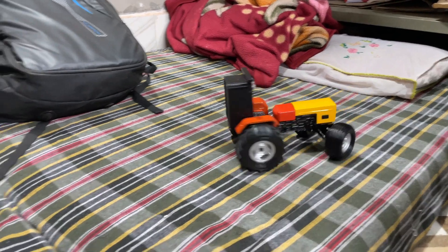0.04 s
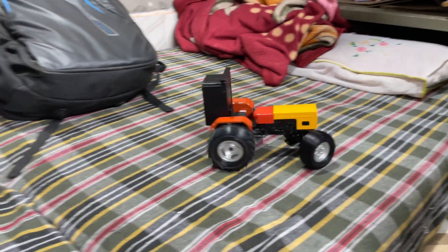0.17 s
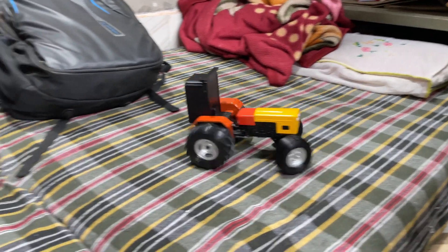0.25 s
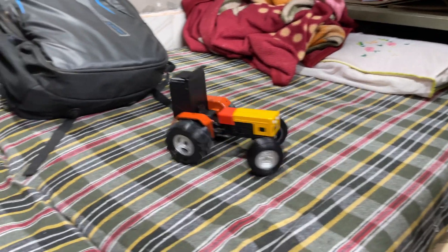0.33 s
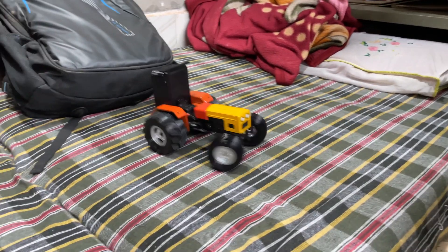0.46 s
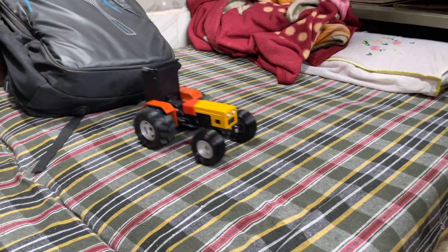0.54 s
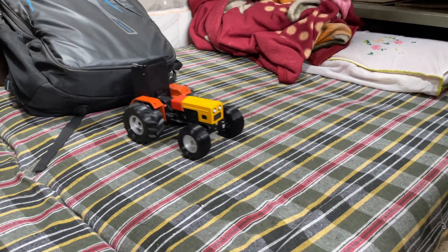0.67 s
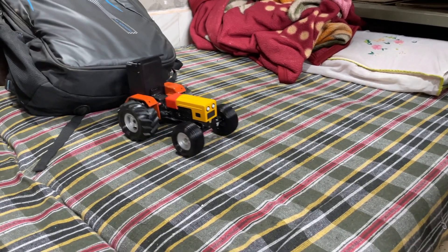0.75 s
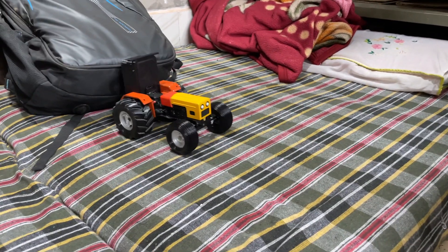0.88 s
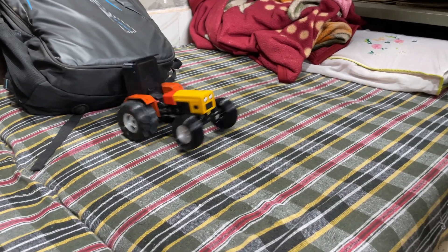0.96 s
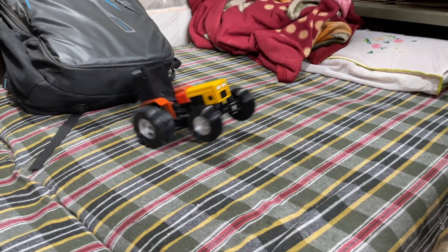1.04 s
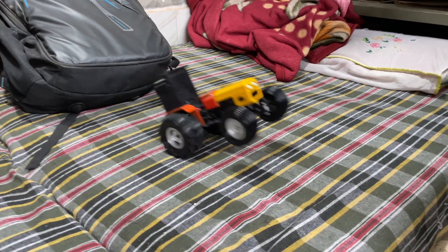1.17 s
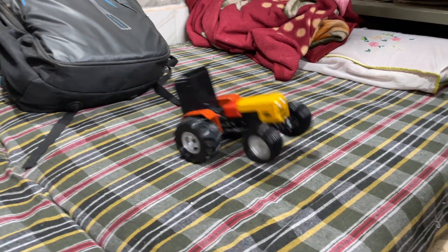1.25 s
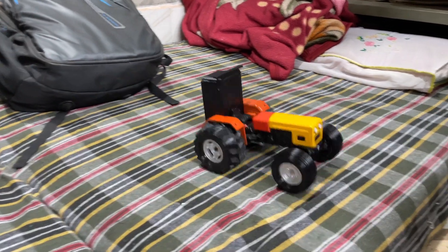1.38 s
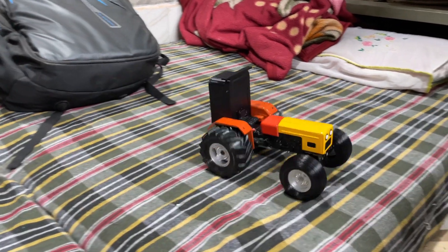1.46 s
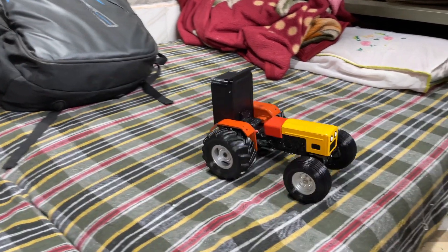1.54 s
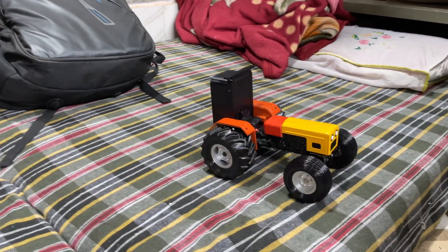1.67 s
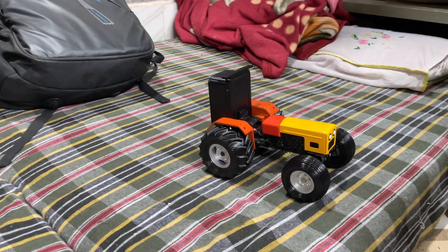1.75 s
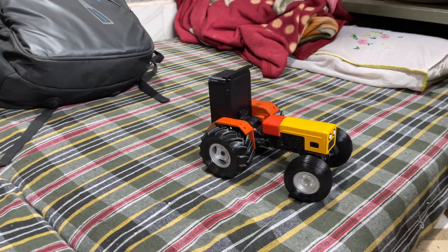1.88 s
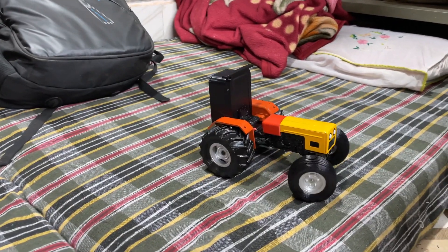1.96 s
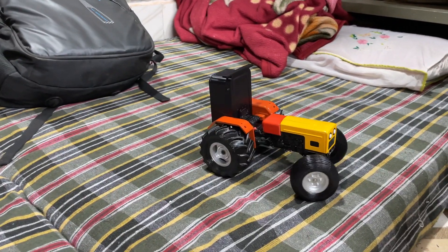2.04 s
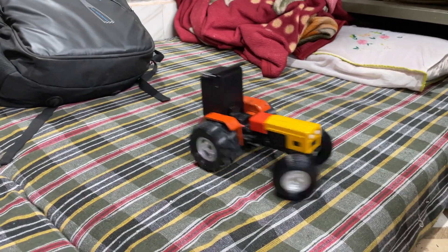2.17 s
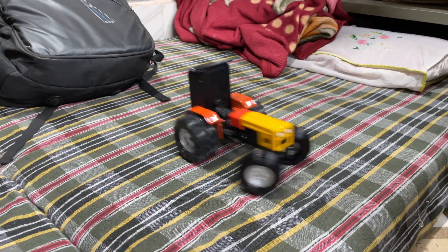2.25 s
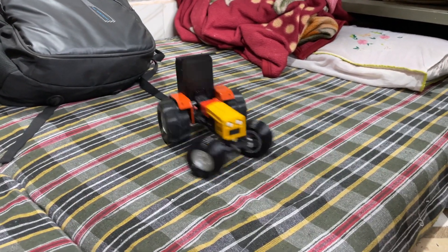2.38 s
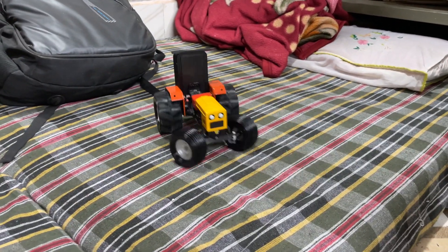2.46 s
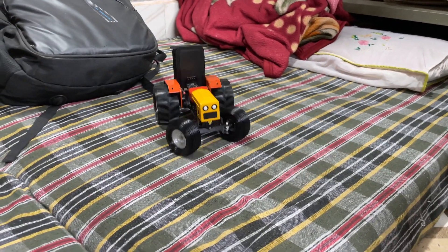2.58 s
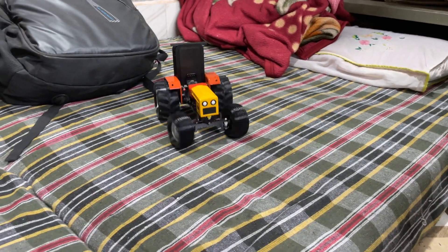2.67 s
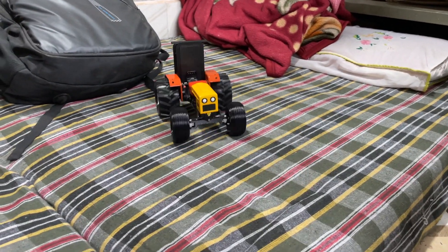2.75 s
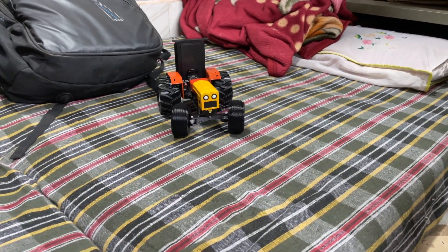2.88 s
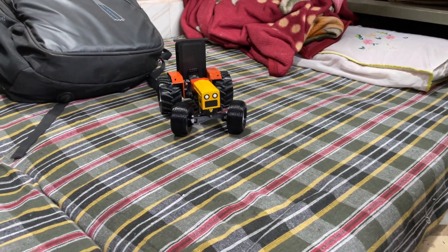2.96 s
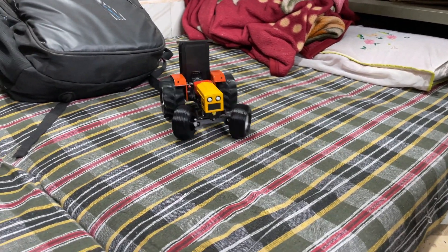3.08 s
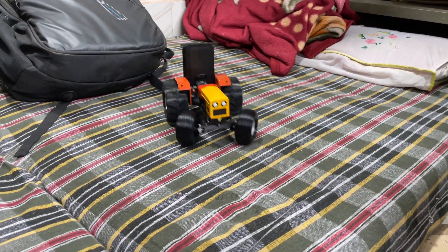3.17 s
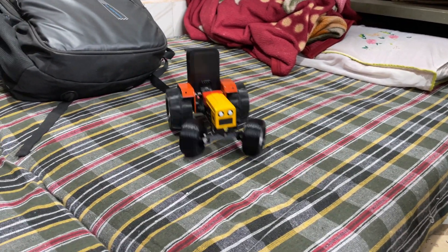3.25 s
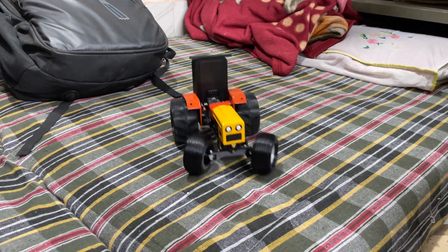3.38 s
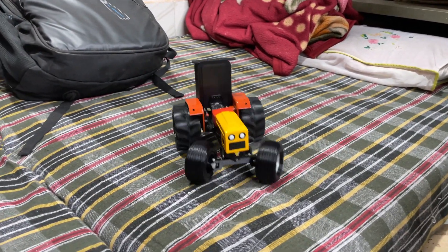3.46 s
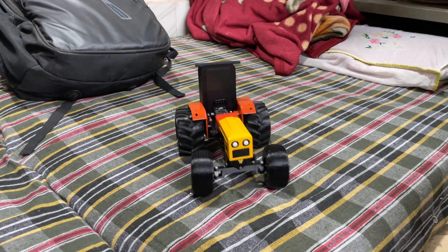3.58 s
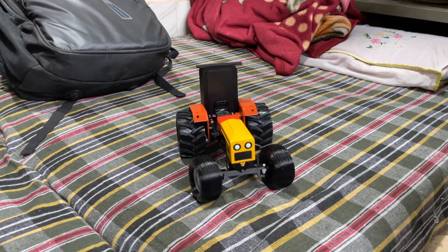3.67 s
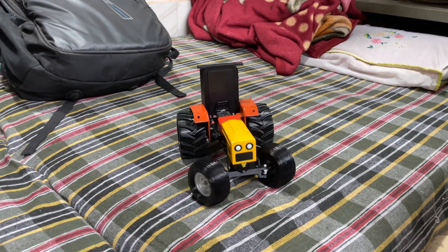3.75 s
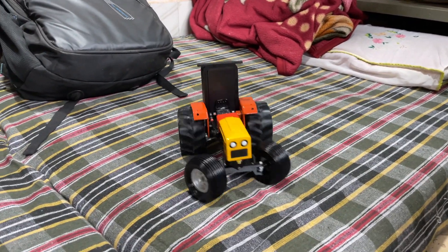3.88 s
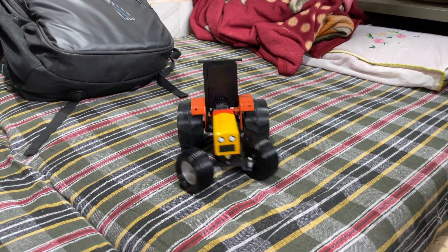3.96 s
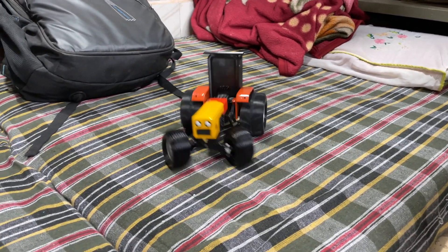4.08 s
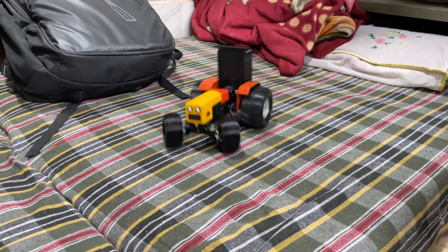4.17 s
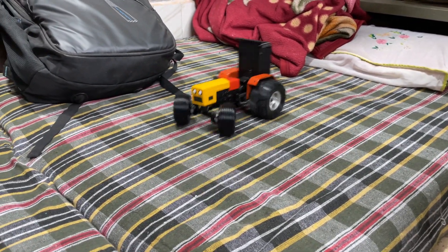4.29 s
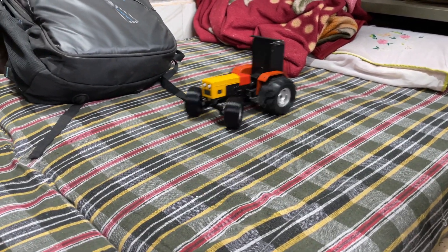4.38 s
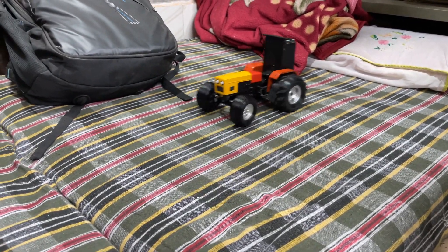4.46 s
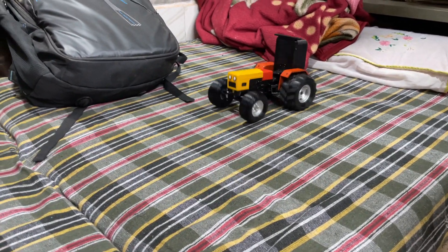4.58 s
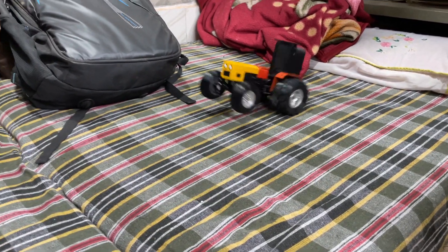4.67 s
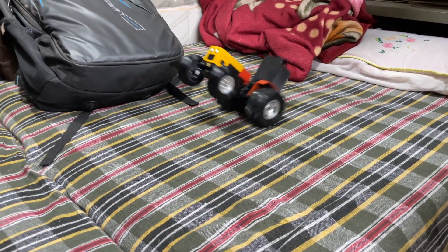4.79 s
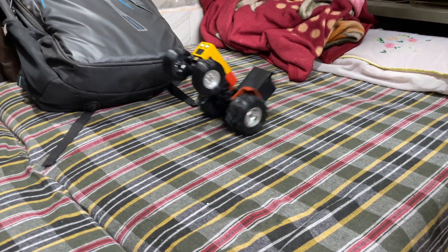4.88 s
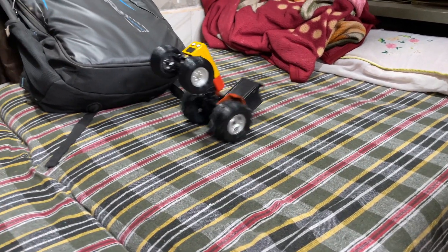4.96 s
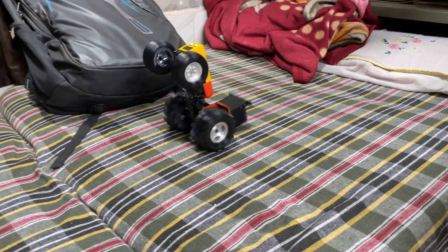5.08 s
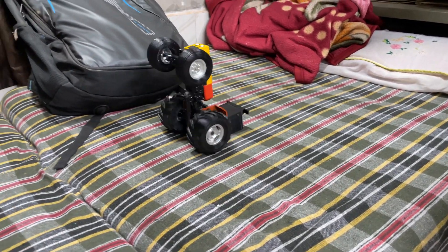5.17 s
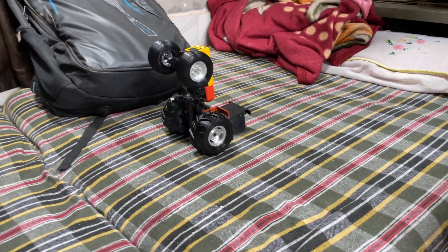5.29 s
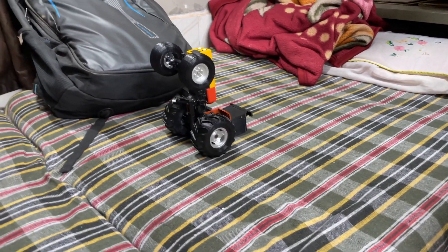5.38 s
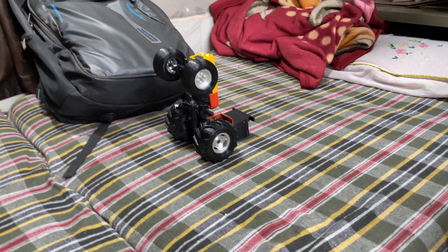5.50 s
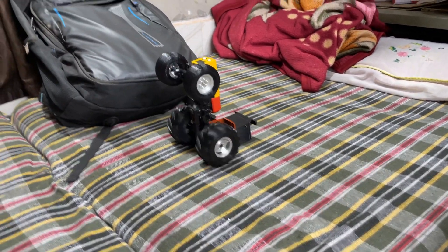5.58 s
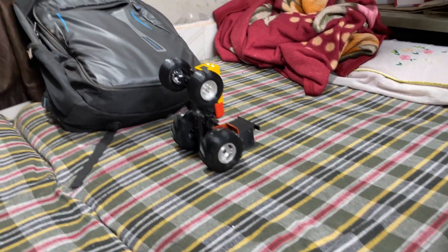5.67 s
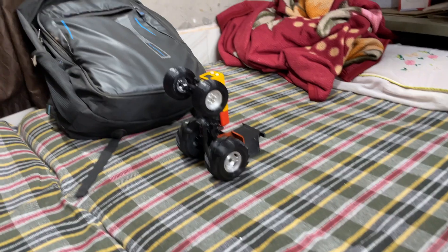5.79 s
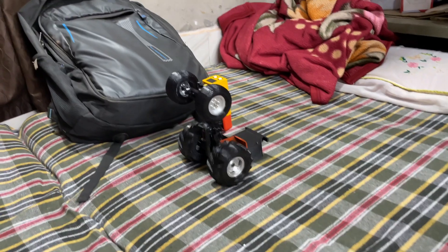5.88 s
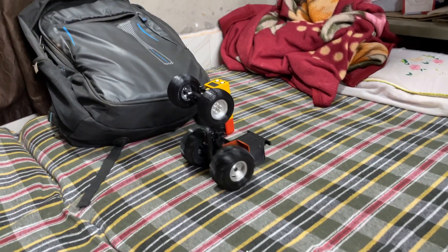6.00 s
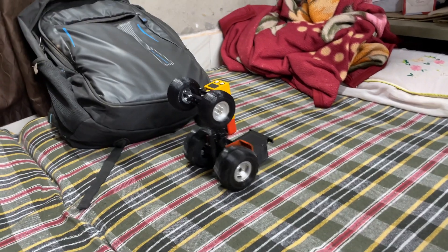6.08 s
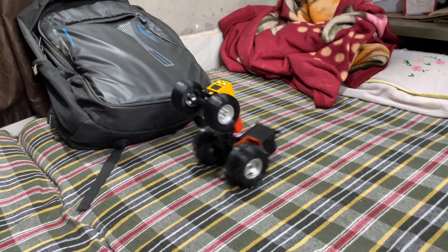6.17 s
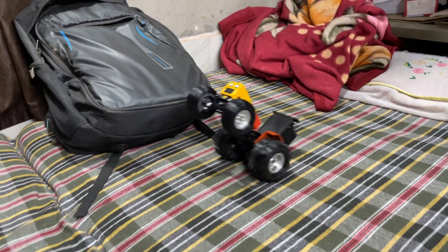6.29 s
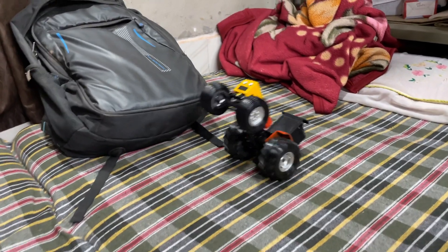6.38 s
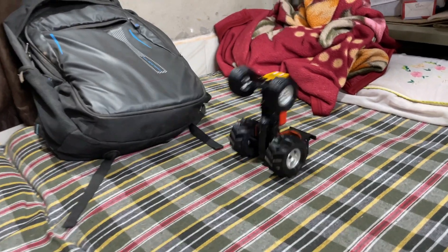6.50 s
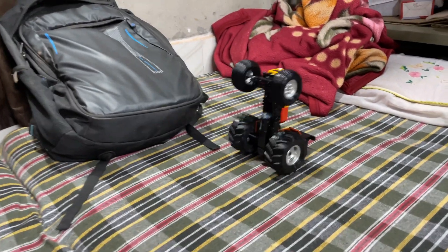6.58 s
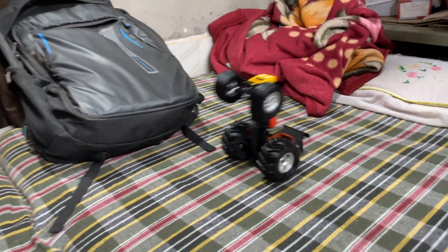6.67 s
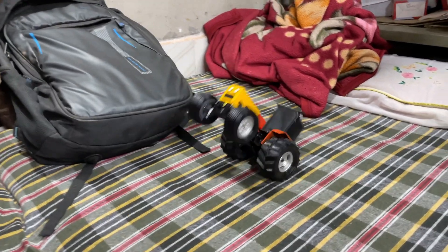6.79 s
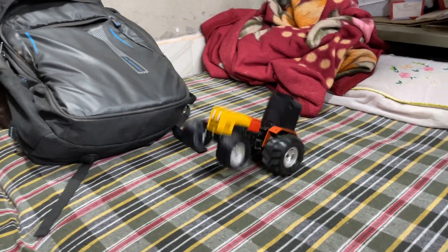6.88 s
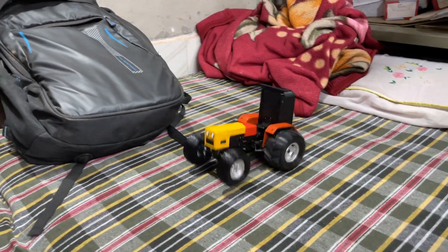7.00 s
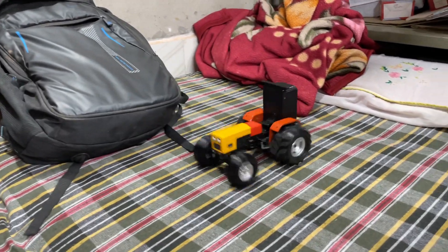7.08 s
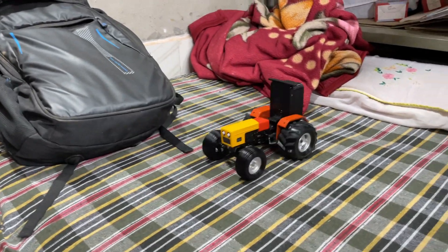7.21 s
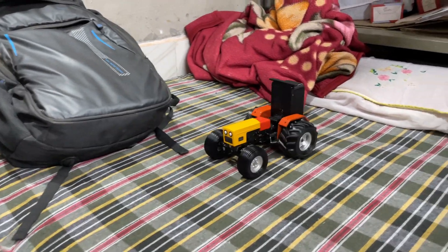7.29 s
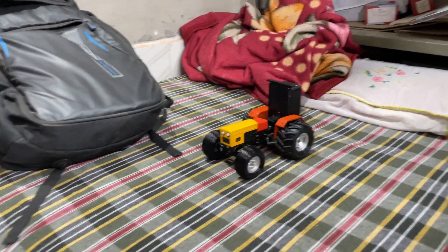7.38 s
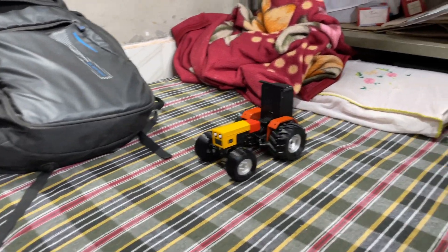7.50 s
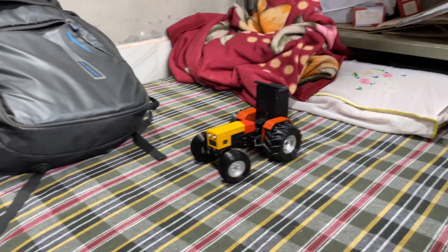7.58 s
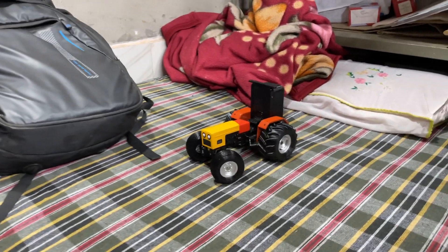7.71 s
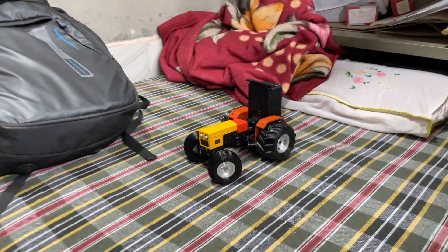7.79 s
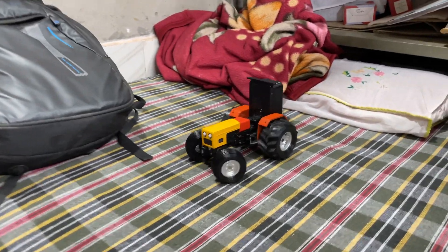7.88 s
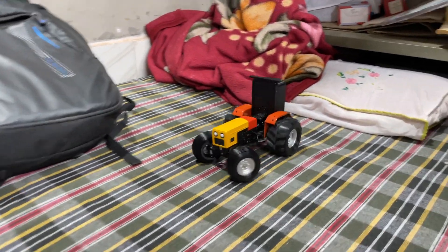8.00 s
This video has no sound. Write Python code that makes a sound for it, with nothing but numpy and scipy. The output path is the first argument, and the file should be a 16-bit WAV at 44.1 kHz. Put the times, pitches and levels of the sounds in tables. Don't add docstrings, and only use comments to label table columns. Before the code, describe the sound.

A remote-control toy tractor drives on a mattress in a quiet bedroom, heard close by in stereo on a phone. Its motor and plastic gears make harsh, buzzy whines that rush up and sag, with near-quiet gaps. Sharp gear snaps mark some starts and reversals, soft wheel thumps hit the bedding, and one very hard crack cuts off a late burst. Faint servo ticking and fan rumble sit underneath.

```python
import sys
import numpy as np
from scipy import signal
from scipy.fft import rfft, irfft
from scipy.io import wavfile
from scipy.ndimage import uniform_filter1d

SR = 44100
rng = np.random.default_rng(int(sys.argv[2]) if len(sys.argv) > 2 else 0)


def store_wav(level_fs):
    pcm = np.round(np.clip(np.atleast_2d(level_fs), -1, 1) * 32767)
    wavfile.write(sys.argv[1], SR, pcm.T.astype(np.int16))


def ratio(d):
    e = np.asarray(d, float) / 20
    return 10 ** e


N = 354740
T = np.arange(N) / SR
HZ = np.arange(N // 2 + 1) * SR / N

# on in seconds, off in seconds, top tooth mesh rate in Hz,
# spin-up in seconds, coast-down in seconds.
PUSHES = [
    (-.241, .365, 1750, .281, .31),
    (.905, 1.1, 2095, .061, .26),
    (2.044, 2.338, 1925, .14, .3),
    (3.077, 3.287, 1557, .113, .31),
    (3.887, 4.24, 2132, .116, .32),
    (4.559, 4.828, 2240, .097, .455),
    (5.567, 5.79, 1620, .093, .22),
    (5.979, 6.16, 2280, .04, .237),
    (6.72, 7.035, 2150, .17, .07),
    (7.776, 8.1, 1254, .187, .3),
]
# time in seconds, rattle level in dB.
EFFORT = [
    [(0.0, -25), (0.176, -23), (0.224, -24.5), (0.4, -23), (0.476, -27), (0.9, -38.5)],
    [(0.9, -46.5), (0.92, -30.5), (0.968, -21), (1.224, -24.5), (1.588, -36), (1.71, -61)],
    [(2.03, -61), (2.048, -43.5), (2.09, -28.5), (2.196, -20.5), (2.39, -22), (2.97, -48.5)],
    [(2.97, -48.5), (3.098, -27.5), (3.274, -22.5), (3.33, -24), (3.524, -29), (3.76, -49.5)],
    [(3.77, -45), (3.876, -33.5), (3.982, -21), (4.38, -25.5), (4.544, -33), (4.57, -45)],
    [(4.57, -42.5), (4.632, -21.5), (4.976, -26), (4.984, -24.5), (5.236, -30.5), (5.36, -61.5)],
    [(5.53, -66), (5.588, -29.5), (5.662, -25), (5.824, -22.5), (5.926, -28.5), (5.96, -41.5)],
    [(5.96, -42), (5.988, -34.5), (6.018, -24), (6.136, -21.5), (6.398, -30.5), (6.5, -49.5)],
    [(6.62, -60), (6.634, -43.5), (6.708, -29), (6.97, -20.5), (7.42, -40), (7.5, -53.5)],
    [(7.77, -56.5), (7.866, -31.5), (7.94, -27), (8.04, -26)],
]
# dB of order 1, of order 2, of order 3,
# of higher orders and treble.
FACING = [(1, 2, -3, 0), (2, 6, -2, 0), (-2, 2, 2, 2), (0, 6, -4, 0), (-1, 4, 6, 2), (1, 2, 4, 0),
          (-4, 3, -2, 0), (1, 4, 0, -1), (-3, -1, 2, -1), (7, -5, -8, -2)]
# order, dB over the rattle, dB change when coasting.
MESH_ORDERS = [(1, 3, -2), (2, 3, -8), (3, 4, -7), (4, 5, -8), (5, 9, -10), (6, 12, -10), (7, 0, -10)]
# frequency in Hz, level in dB per Hz.
SHELL = [(300, -46.5), (700, -15), (1000, -7.5), (1500, 0), (2500, -2.5), (4500, -3), (6200, -5),
         (7100, -8), (8400, -4), (9600, -5), (11500, -6), (12800, -12.5), (13800, -17), (16000, -32.5)]
# frequency in Hz, width in Hz, gain in dB.
SHELL_MODES = [(1000, 120, 4), (1520, 350, 5), (2000, 250, 2), (2950, 250, 4), (3550, 150, 2),
               (4400, 500, 5), (5450, 250, 2.5), (6100, 350, 3), (10600, 600, 3), (12400, 600, 3)]
# start in seconds,
# peak in dB.
SNAPS = [(0.9238, -9.5), (2.2606, -10), (4.598, -7.5), (4.8317, -6.5), (6.499, -38), (6.507, -37),
         (6.568, -38), (7.0444, -0.5), (7.5355, -31.5), (7.5961, -37), (7.6405, -39), (7.8076, -41)]
# start in seconds, peak in dB, frequency in Hz, t60 in seconds.
HUB_KNOCK = [
    (7.043, -11, 950, 0.035),
    (7.045, -13, 1500, .025),
]
# start in seconds, peak in dB.
THUMPS = [(.78, -37), (.95, -36), (1.05, -36), (1.19, -38), (1.341, -26), (1.423, -31), (5.939, -23),
          (6.778, -32), (6.83, -32), (6.963, -20), (7.12, -23)]
# frequency in Hz, level in dB per Hz.
FOAM = [(20, -33), (60, 6.5), (160, -1), (400, -9.5), (1000, -23.5), (3000, -65)]
# on in seconds, off in seconds, level in dB.
BRUSH = [
    (.64, .87, -39),
]
# on in seconds, off in seconds, level in dB.
CHOPPER = [(1.99, 2.08, -56.5), (2.95, 3.03, -85), (3.62, 3.82, -51.5), (5.51, 5.59, -53), (6.44, 6.5, -55),
           (6.62, 6.66, -53), (7.68, 7.83, -55)]
# multiple, level in dB.
CHOPPER_ORDERS = [(1, -2), (2, 3), (3, -5), (4, -3.5), (5, -13), (6, -22), (7, -21), (8, -8), (9, -8),
                  (10, -18), (11, -11), (12, -17), (14, -27)]
# on in seconds, off in seconds, level in dB.
SERVO = [
    (1.77, 2.06, -54.5),
    (2.88, 3.01, -78.5),
    (3.67, 3.8, -66.5),
    (7.49, 7.83, -64.5),
]
# frequency in Hz, width in Hz, gain in dB.
SERVO_MODES = [(4230, 300, 9), (6130, 600, 14), (9300, 1500, 6)]
# frequency in Hz, right lead in radians, share of direct sound 0-1.
PORTS = [(150, 0, .95), (400, -.7, .45), (1200, -.3, .8), (1900, -.2, .65), (2400, -2, .5),
         (3300, -1.4, .6), (3800, -1, .2), (4300, 0, .7), (5000, -.9, .7), (5700, 1.3, .6), (6800, 1, .3),
         (7500, 2.7, .88), (8600, 3.14, .975), (11000, 4.4, .92), (12800, 5.6, .88), (13300, 6.283, 1)]
# frequency in Hz, left minus right in dB.
LEFT_DB = [(300, -0.5), (600, 3.5), (1300, -1), (3000, 1.5), (7000, 1), (8000, 1)]
# frequency in Hz, common share 0-1.
ROOM_ALIKE = [(150, .95), (300, .45), (1400, .2), (7000, .6), (13000, 1)]
# frequency in Hz, level in dB per Hz.
ROOM = [(25, -47), (40, -11), (55, 1), (77, 1), (100, -1.5), (160, -16.5), (280, -9.5), (600, -13.5),
        (1000, -11.5), (1600, -17.5), (2500, -22), (4000, -45), (12000, -44.5), (15500, -84)]

SLOWEST_HZ = 700


def unit(x):
    return x / np.sqrt(np.mean(x ** 2))


def across(table, column=1):
    rows = np.array(table, float)
    return np.interp(np.log(HZ + 1), np.log(rows[:, 0]), rows[:, column])


def ring(x, slope, modes):
    db = across(slope)
    for hz, width, gain_db in modes:
        db = db + gain_db / (1 + (2 * (HZ - hz) / width) ** 2)
    cepstrum = irfft(db * np.log(10) / 20, N)
    cepstrum[1:N // 2] *= 2
    cepstrum[N // 2 + 1:] = 0
    shape = np.exp(rfft(cepstrum))
    return irfft(rfft(x) * shape / np.sqrt(np.mean(abs(shape) ** 2)), N)


def walk(rate):
    k = int(SR / rate)
    steps = np.repeat(rng.standard_normal(N // k + 1), k)
    return 1.323 * uniform_filter1d(uniform_filter1d(steps, k), k)[:N]


def clicks(rate, scatter_db):
    hit, size, sign = rng.random(N), rng.exponential(size=N), rng.standard_normal(N)
    share = np.clip(rate / SR, 0, 1)
    return unit((hit < share) * ratio(scatter_db * size) * sign / np.sqrt(share))


def gate(spans, edge_s):
    gain = sum(ratio(db) * ((T > on) & (T < off)) for on, off, db in spans)
    return uniform_filter1d(gain, int(edge_s * SR))


def motor():
    mesh_hz = np.zeros(N)
    for on, off, top_hz, up_s, down_s in PUSHES:
        spin_up = np.tanh((np.minimum(T, off) - on) / up_s)
        coast = np.exp(-np.clip(T - off, 0, None) / down_s)
        mesh_hz = np.where(T > on, top_hz * spin_up * coast, mesh_hz)
    mesh_hz = uniform_filter1d(mesh_hz, int(.034 * SR))
    throttle = gate([(push[0], push[1], 0) for push in PUSHES], 0.047)
    return mesh_hz, throttle


def effort_db():
    rows = np.concatenate(EFFORT)
    return np.interp(T, rows[:, 0], rows[:, 1])


def facing_db():
    push = np.clip(np.searchsorted([row[0] for row in PUSHES], T) - 1, 0, None)
    return uniform_filter1d(np.array(FACING, float)[push].T, int(.02 * SR))


def gear_rattle(mesh_hz, load, shaft, rattle_db, treble_facing_db):
    turning_db = load * (1.5 * np.cos(shaft) + 0.55 * np.cos(shaft / 2.6))
    wobble = ratio(turning_db + 0.74 * walk(40))
    speed_hz = np.maximum(mesh_hz, SLOWEST_HZ)
    impacts = clicks(7.5 * speed_hz, scatter_db=1.7)
    strikes = wobble * (impacts + 0.76 * rng.standard_normal(N))
    rattle = unit(ring(strikes, SHELL, SHELL_MODES))
    top = signal.sosfiltfilt(signal.butter(2, 7600, "high", fs=SR, output="sos"), rattle)
    treble_db = 2.5 + treble_facing_db / 4 + 5.5 * np.log2(speed_hz / 1500)
    treble_db = treble_db + .5 * np.minimum(rattle_db + 33, 0)
    rattle = ratio(rattle_db + 1.5) * (rattle - top) + ratio(rattle_db + treble_db + 10.5) * top
    resting = np.clip((rattle_db + 62) / 13, 0, 1)
    return resting * rattle


def gear_whine(throttle, load, phase, shaft, rattle_db, facing):
    flutter_db, patchy_db, smear_rad = 2, 1.6, .09
    beat = 0
    for k, db, coast_db in MESH_ORDERS:
        order_db = db + facing[min(k, 4) - 1] + coast_db * (1 - throttle)
        uneven_db = flutter_db * walk(90) + patchy_db * walk(13) + 1.5 * np.cos(shaft + k)
        beat = beat + ratio(order_db + uneven_db) * np.sin(k * (phase + smear_rad * walk(250)))
    peaky_modes = [(hz, width, 1.6 * db) for hz, width, db in SHELL_MODES]
    return ring(load * ratio(rattle_db - 12) * beat, SHELL, peaky_modes)


def gearbox():
    pinion_teeth, whine_ends_hz = 13, 1300
    mesh_hz, throttle = motor()
    load = np.clip(mesh_hz / whine_ends_hz, 0, 1) ** 2.2
    phase = 2 * np.pi * np.cumsum(mesh_hz * (1 + .0045 * walk(120))) / SR
    shaft = phase / pinion_teeth
    rattle_db, facing = effort_db(), facing_db()
    rattle = gear_rattle(mesh_hz, load, shaft, rattle_db, facing[-1])
    return rattle + gear_whine(throttle, load, phase, shaft, rattle_db, facing)


def snaps():
    blows = sum(ratio(db) * (T > s) * np.exp(-np.abs(T - s) / 0.001) for s, db in SNAPS)
    knock = 0
    for s, db, hz, t60 in HUB_KNOCK:
        decay = (T > s) * ratio(-60 * np.abs(T - s) / t60)
        knock = knock + ratio(db) * decay * np.sin(2 * np.pi * hz * (T - s))
    return ratio(-3) * ring(blows * rng.standard_normal(N), SHELL, SHELL_MODES) + knock


def thumps():
    boom, scuff = 0, 0
    for s, db in THUMPS:
        age = np.clip(T - s, 0, None)
        turns = 75 * age + 1.8 * (1 - np.exp(-age / 0.018))
        swell = np.clip(age / 0.012, 0, 1) * ratio(-60 * age / 0.12)
        boom = boom + ratio(db - 1.5) * swell * np.sin(2 * np.pi * turns)
        scuff = scuff + ratio(db) * (T > s - .008) * ratio(-60 * np.abs(T - s + 0.01) / 0.31)
    cloth = [(60, -21), (200, 3.0), (700, -5.5), (1200, -1.5), (4000, -50)]  # Hz, dB per Hz
    return boom + ratio(-10.0) * ring(scuff * rng.standard_normal(N), cloth, [])


def tyres():
    rebound_db, rebound_t60_s = -13.5, 0.29
    rebound = sum(ratio(db + rebound_db - 60 * np.abs(T - s) / rebound_t60_s) * (T > s) for s, db in THUMPS)
    knead = ratio(-50 + .2 * (effort_db() + 28.5)) + rebound
    rumble = unit(ring(rng.standard_normal(N), FOAM, [(209, 550, 15.0)]))
    return knead * ratio(3.2 * walk(30)) * rumble


def brushing():
    cloth = [(300, -25.5), (600, -2.0), (800, -3.0), (1100, -3.0), (2000, -34)]  # Hz, dB per Hz
    return gate(BRUSH, 0.13) * unit(ring(clicks(900, scatter_db=-1.0), cloth, []))


def chopper():
    phase = 2 * np.pi * 993.5 * T
    song = sum(ratio(db) * np.sin(k * phase + k * k) for k, db in CHOPPER_ORDERS)
    return gate(CHOPPER, 0.0072) * song


def servo():
    nudge_db, uneven_db = 6, 3
    nudge_phase = 2 * np.pi * np.cumsum(35 * (1 + 0.23 * walk(20))) / SR
    nudges = ratio(nudge_db * np.cos(nudge_phase) + uneven_db * walk(28))
    case = [(1500, -20), (3500, 0), (10000, -5), (13000, -14), (15000, -30)]  # Hz, dB per Hz
    ticks = unit(ring(nudges * rng.standard_normal(N), case, SERVO_MODES))
    whistle_phase = 2 * np.pi * np.cumsum(15612 + 40 * walk(300)) / SR
    whistle = ratio(3 + 2.5 * walk(80)) * np.sin(whistle_phase)
    return gate(SERVO, .008) * (ticks + whistle)


def ports(common, left, right, share):
    share = np.clip(share, 0, 1)
    turn = np.exp(.5j * across(PORTS)) * ratio(-across(LEFT_DB) / 2)
    left_port = (common * np.sqrt(share) + left * np.sqrt(1 - share)) / turn
    right_port = (common * np.sqrt(share) + right * np.sqrt(1 - share)) * turn
    return irfft(np.array([left_port, right_port]), N)


def bedroom(x, t60, place_s):
    hop, age = int(place_s * SR), T[:int(t60 * SR)]
    padded, scattered = np.pad(x, (hop, 2 * hop)), np.zeros((2, N + 6 * hop))
    for start in range(0, N + hop, hop):
        tails = rng.standard_normal((2, len(age))) * ratio(-60 * age / t60)
        tails /= np.sqrt(np.sum(tails ** 2, axis=1, keepdims=True))
        piece = padded[start:start + 2 * hop] * np.sqrt(np.hanning(2 * hop))
        heard = signal.fftconvolve(piece[None], tails, axes=1)
        scattered[:, start:start + heard.shape[1]] += heard
    left, right = rfft(scattered[:, hop:hop + N])
    return ports(rfft(x), left, right, across(PORTS, column=2))


def background():
    noises = [rfft(rng.standard_normal(N)) * ratio(across(ROOM)) for _ in range(3)]
    air = unit(ports(*noises, across(ROOM_ALIKE))) * ratio(-44.5 + .8 * walk(1.5))
    hum_hz, drift_hz, hum_db, unsteady_db = 117.4, 5, -46.5, 3
    hum_phase = 2 * np.pi * np.cumsum(hum_hz + drift_hz * walk(12)) / SR
    return air + ratio(hum_db + unsteady_db * walk(25)) * np.sin(hum_phase)


def scene():
    toy = gearbox() + snaps() + thumps() + tyres() + brushing() + chopper() + servo()
    return bedroom(toy, t60=.07, place_s=.2) + background()


def roll_off(x):
    return signal.sosfilt(signal.butter(12, 15720, fs=SR, output="sos"), x)


def record(dry):
    mix = np.tanh(1.15 * dry) / 1.15
    return roll_off(mix)


dry = scene()
out = record(dry)
store_wav(out)
```